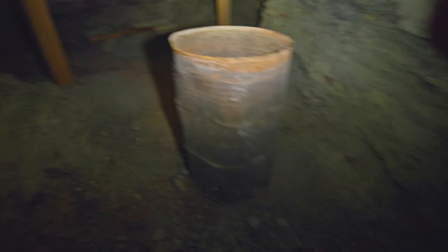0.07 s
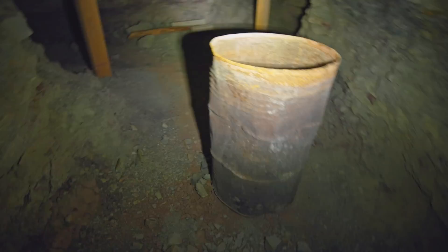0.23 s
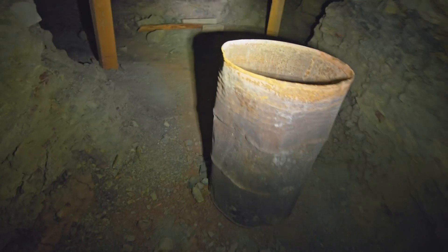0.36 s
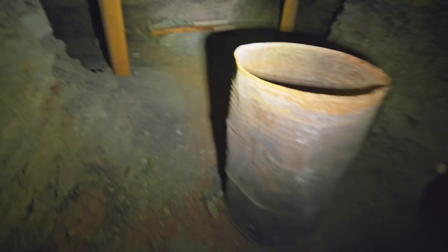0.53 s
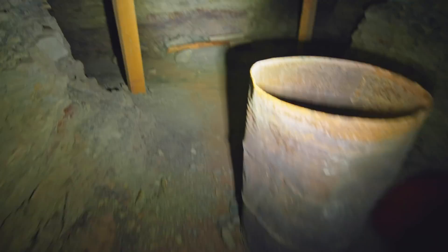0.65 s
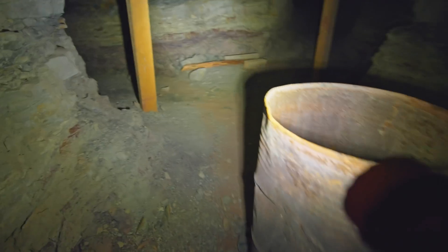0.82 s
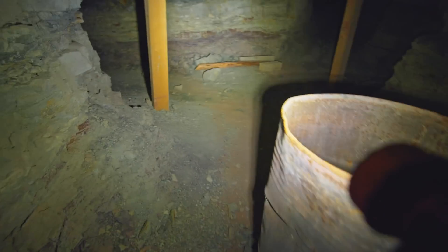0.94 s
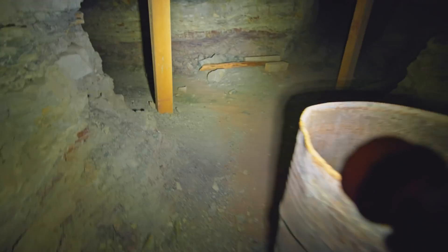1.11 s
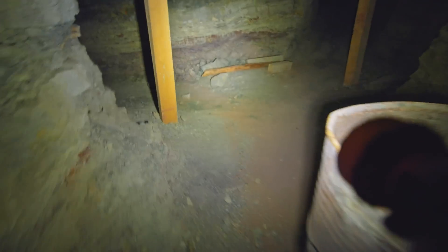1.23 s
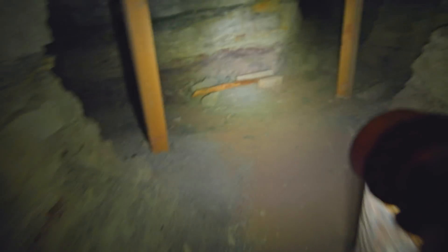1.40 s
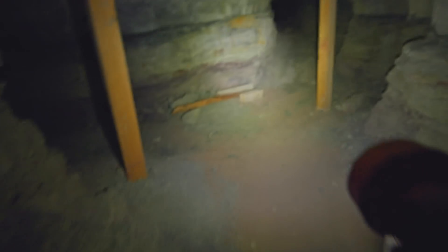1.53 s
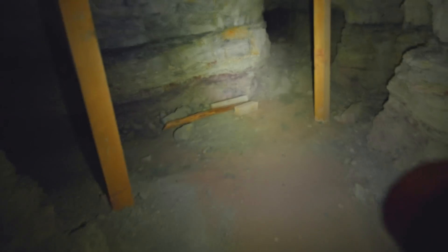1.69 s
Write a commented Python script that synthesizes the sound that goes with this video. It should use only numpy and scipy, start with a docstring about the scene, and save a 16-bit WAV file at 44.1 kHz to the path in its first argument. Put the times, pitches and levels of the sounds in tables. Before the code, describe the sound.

A few loose stones clack, then a boot lands hard with a hollow knock and gritty crunch, a stone clicks, and a second softer crunch follows; close handheld microphone, short echo off rock walls.

```python
"""Two footsteps in a mine tunnel

Boots land on loose rock and gravel in a narrow tunnel, heard from a hand-held camera.
Pressure of the sole drives noise grains (stones, grit, sand); struck sines thump, knock, crack and chink.
Loose stones clack as short coloured noise; the rock walls answer with early echoes and a bass-heavy tail.
Filtered noise gives faint hiss, the rumble of the moving camera and the brush of trousers."""
import sys
import numpy as np
from scipy import signal
from scipy.fft import rfft, irfft, next_fast_len
from scipy.io import wavfile

SR = 44100
rng = np.random.default_rng(int(sys.argv[2]) if len(sys.argv) > 2 else 0)


def log_audio(samples):
    """Write samples as a 16-bit WAV file to the path given in sys.argv[1]."""
    # one column per channel
    frames = np.atleast_2d(samples).T
    # limit to full scale, then quantise
    limited = np.clip(frames, -1, 1)
    pcm = np.round(limited * 32767).astype(np.int16)
    wavfile.write(sys.argv[1], SR, pcm)


N = 77175

# spectrum of grit: (frequency [Hz], relative density [dB per Hz])
GRIT_COLOUR = [(300, -6), (1200, 0), (2500, 2.5), (4100, 3), (5200, -11.5), (7000, -20), (10000, -32),
               (15000, -42)]
# spectrum of sand and cloth: (frequency [Hz], relative density [dB per Hz])
SAND_COLOUR = [(1500, -28), (4000, 4), (6500, 0.5), (10000, -7), (15000, -11.5)]


def amp(db):
    """Decibels to gain."""
    return 10 ** (np.asarray(db) / 20)


def unit(x):
    """Scale to rms 1."""
    return x / np.sqrt(np.mean(x ** 2) + 1e-20)


def along(points, hz):
    """Interpolate (Hz, value) points on a log frequency axis."""
    point_hz, value = np.transpose(points)
    return np.interp(np.log(hz + 1), np.log(point_hz + 1), value)


def curve(rows):
    """Interpolate (s, value) points at every sample."""
    return np.interp(np.arange(N) / SR, *np.transpose(rows))


def since(start_s):
    """Seconds since a moment, zero before it."""
    return np.maximum(np.arange(N) / SR - start_s, 0)


def ring(t, t60_s, rise_s):
    """Envelope with a quick rise and an exponential fall of 60 dB per t60."""
    return np.exp(-np.log(1000) * t / t60_s) * (1 - np.exp(-t / rise_s))


def mode(start_s, db, hz, t60_s, rise_s):
    """One struck resonance: a decaying sine."""
    t = since(start_s)
    return amp(db) * ring(t, t60_s, rise_s) * np.sin(2 * np.pi * hz * t)


def colour(x, points, tilt_db_per_octave=0):
    """Minimum-phase filter of unit energy through (Hz, dB) points; the tilt acts above 500 Hz."""
    m = 2 * next_fast_len(N)
    hz = np.fft.rfftfreq(m, 1 / SR)
    gain_db = along(points, hz) + tilt_db_per_octave * np.log2(np.maximum(hz, 500))
    gain = unit(amp(gain_db))
    # folding the cepstrum makes the filter causal
    cepstrum = irfft(np.log(gain + 1e-6))
    fold = np.r_[1, np.full(m // 2 - 1, 2), np.zeros(m // 2)]
    response = np.exp(rfft(cepstrum * fold))
    return irfft(rfft(x, m) * response)[:N]


def resonate(x, modes):
    """Parallel resonances of unit energy together; heavy stones pass on little above the contact limit."""
    contact_hz = 2650
    m = 2 * next_fast_len(N)
    f = np.fft.rfftfreq(m, 1 / SR)
    response = sum(amp(db) * 1j * f * width_hz / (hz * hz - f * f + 1j * f * width_hz)
                   for hz, width_hz, db in modes)
    response = response / (1 + 1j * f / contact_hz) ** 2
    response = response / np.sqrt(np.mean(np.abs(response) ** 2))
    return irfft(rfft(x, m) * response, m)[:N]


def grains(per_s, spread_db):
    """Random contacts of either sign and scattered size, rms 1."""
    chance, size, side = rng.random(N), rng.standard_normal(N), rng.standard_normal(N)
    contact = chance < per_s / SR
    return unit(contact * np.sign(side) * amp(spread_db * np.clip(size, -2, 2)))


def load(start_s, attack_s, hold_s, release_db_per_s, rise_share=1):
    """Pressure of the sole: it rises, holds and lets go."""
    rise = np.minimum(since(start_s) / (attack_s * rise_share), 1)
    return rise * amp(-release_db_per_s * since(start_s + attack_s + hold_s))


def hiss():
    """Faint steady noise whose level wavers."""
    # (frequency [Hz], relative density [dB per Hz])
    air_colour = [(20, 4.5), (90, -2), (150, -6.5), (280, -9), (460, -9.5), (700, -15), (1250, -19),
                  (1630, -14.5), (2500, -23.5), (3500, -15), (4300, -22), (5200, -29.5), (8000, -39),
                  (15000, -43)]
    # (time [s], level over the base [dB])
    hiss_sway = [(0, 7), (.2, 1), (.45, 3), (.9, -0.5), (1.0, 3), (1.12, 5), (1.4, 3), (1.6, -2),
                 (1.75, 2.5)]
    base_db = -53
    return amp(base_db + curve(hiss_sway)) * unit(colour(rng.standard_normal(N), air_colour))


def camera_rumble():
    """Low noise that swells and sinks as the carried camera moves."""
    # (frequency [Hz], relative density [dB per Hz])
    rumble_colour = [(5, -25.5), (13, 19), (28, 2.5), (50, -6.5), (85, -9.5), (130, -31.5), (400, -57.5)]
    # (time [s], level over the base [dB])
    rumble_sway = [(0, 3.5), (.25, 7), (.43, 11.5), (.53, 9), (.64, 11), (.8, 19), (.92, 4.5), (1.2, -5),
                   (1.45, 5.5), (1.75, 7)]
    base_db = -49
    return amp(base_db + curve(rumble_sway)) * unit(colour(rng.standard_normal(N), rumble_colour))


def swishes():
    """Trousers brush as a leg swings: bright noise under smooth humps."""
    # (centre time [s], width [s], level [dB])
    swings = [(0.391, 0.036, -67.5), (1.17, .075, -71.5), (1.69, 0.12, -72.5)]
    level = sum(amp(db) * np.exp(-((since(0) - centre_s) / width_s) ** 2) for centre_s, width_s, db in swings)
    return level * colour(rng.standard_normal(N), SAND_COLOUR)


def clacks():
    """A loose stone strikes with its own brightness and ring; the rough rock nearby scatters the sound."""
    # (time [s], level [dB], tilt [dB per octave], rise [s], ring [Hz], ring boost [dB], scatter t60 [s])
    strikes = [(0.14, -36.5, 1.2, 0.0033, 870, 5.5, 0.15), (.229, -32, -2.1, 0.00024, 1490, 6, 0.13),
               (0.2522, -39, 0.5, 0.0014, 2700, 17, 0.031), (.307, -45.5, 0, .0003, 700, 7, 0.048),
               (.454, -38.5, 4.5, 0.0034, 1680, 3, 0.063), (.842, -29.5, 0.24, 0.00061, 1955, 6, 0.16),
               (.882, -62, 7, 0.00013, 1490, 16, 0.064), (1.197, -49.5, 4.5, 0.00046, 2030, 15, 0.17)]
    # (frequency [Hz], relative density [dB per Hz])
    clack_colour = [(60, -30.5), (180, -2), (320, -6.5), (480, -2.5), (650, 0.5), (1000, -3.5),
                    (1500, -4.5), (2100, -12), (3000, -10.5), (4200, -15.5), (5300, -23.5), (9000, -33),
                    (15000, -51)]
    strike_t60_s, scatter_db, click_db, ring_width_octaves = 0.0099, -4.5, 1, 0.29
    out = np.zeros(N)
    hz = np.geomspace(30, 16000, 120)
    for start_s, db, tilt, rise_s, ring_hz, ring_db, scatter_t60_s in strikes:
        t = since(start_s)
        direct = 2 * ring(t, strike_t60_s, rise_s)
        scatter = amp(scatter_db) * ring(t, scatter_t60_s, rise_s)
        strike = (direct + scatter) * rng.standard_normal(N)
        # a faster rise clicks harder
        strike[round(start_s * SR)] += amp(click_db) * 0.0016 / rise_s
        ring_bump = np.exp(-(np.log2(hz / ring_hz) / ring_width_octaves) ** 2)
        tone_db = along(clack_colour, hz) + ring_db * ring_bump
        out += amp(db) * colour(strike, np.c_[hz, tone_db], tilt)
    return out


def thumps():
    """The body's weight lands on the floor: low struck modes."""
    # (time [s], level [dB], pitch [Hz], t60 [s])
    landings = [(0.296, -32, 82.5, 0.14), (.578, -25, 92.1, 0.37), (0.623, -26, 51.6, 0.21),
                (.695, -25, 72, 0.14), (1.307, -36, 89, 0.063), (1.387, -29, 80, 0.41),
                (1.447, -31.5, 81.6, 0.26)]
    return sum(mode(start_s, db, hz, t60_s, rise_s=0.0043) for start_s, db, hz, t60_s in landings)


def knocks():
    """Heel and sole knock on big stones: short hollow modes."""
    # (time [s], level [dB], pitch [Hz])
    heel_hits = [(0.5403, -17, 330), (0.5527, -10, 437), (0.5633, -16.5, 426), (0.5701, -16, 473),
                 (0.5736, -35, 405), (0.586, -14, 367), (0.606, -26, 338), (1.299, -37, 320),
                 (1.318, -30.5, 293), (1.546, -34, 370), (1.564, -30.5, 425)]
    return sum(mode(start_s, db, hz, t60_s=0.031, rise_s=0.0016) for start_s, db, hz in heel_hits)


def chinks():
    """Struck stones that go on ringing."""
    # (time [s], level [dB], pitch [Hz], t60 [s])
    ringing_stones = [(.229, -38.5, 589.6, 0.13), (.229, -40.5, 807, 0.083), (0.624, -30.5, 1307, 0.28),
                      (.75, -42.5, 1630, 0.4)]
    return sum(mode(start_s, db, hz, t60_s, rise_s=0.0011) for start_s, db, hz, t60_s in ringing_stones)


def cracks():
    """Larger stones slip under the sole: a few cycles of ring and a gritty snap."""
    # (time [s], level [dB], pitch [Hz])
    slips = [(0.5832, -46, 1100), (.5992, -43, 800), (.6192, -9.5, 710), (.6262, -11, 800),
             (.6345, -8, 1110), (0.656, -9, 1350), (0.675, -10.5, 1090), (1.319, -15, 900),
             (1.365, -17, 1140), (1.42, -19.5, 1170), (1.436, -17.5, 810), (1.4645, -18.5, 770)]
    cycles_per_t60, snap_db = 7.56, -30
    body = sum(mode(start_s, db, hz, cycles_per_t60 / hz, rise_s=0.00063) for start_s, db, hz in slips)
    snap = sum(amp(db + snap_db) * ring(since(start_s), 0.004, 0.0001) for start_s, db, hz in slips)
    return body + colour(snap * rng.standard_normal(N), GRIT_COLOUR)


def stone_beds(pressure):
    """Stones grind together: a broad rattle of rubble plus the ring of the bed under each foot."""
    # rubble: (frequency [Hz], relative density [dB per Hz])
    rubble_colour = [(100, -7), (350, -7), (600, 5.5), (900, 0.5), (1280, 1), (1500, -9.5), (2000, -6),
                     (2700, -15), (4200, -28), (5500, -36), (15000, -68)]
    # resonances of each bed: (frequency [Hz], width [Hz], relative level [dB])
    first_bed = [(340, 15, -18), (433, 19, 15), (591, 8.3, 15), (733, 20, 5), (918, 91, 1.5),
                 (1080, 10, -15), (1294, 52, 2.5), (1360, 38, -2)]
    second_bed = [(314, 68, 4), (630, 30, -12), (810, 150, 3.5), (1110, 30, -8)]
    first_bed_db, second_bed_db = -5.5, -8
    first_rubble_db, second_rubble_db = -2.5, -10.5
    between_steps_s = 1.1
    later = since(between_steps_s) > 0
    first = pressure * ~later * grains(per_s=700, spread_db=4.5)
    # the second foot lands on smaller stones
    second = pressure * later * grains(per_s=2800, spread_db=3)
    rubble = colour(amp(first_rubble_db) * first + amp(second_rubble_db) * second, rubble_colour)
    first_ring = amp(first_bed_db) * resonate(first, first_bed)
    second_ring = amp(second_bed_db) * resonate(second, second_bed)
    return rubble + first_ring + second_ring


def gravel():
    """The sole's pressure drives grinding stones, grit, sand and a dull scuff; grit gives way in bright bursts."""
    # each step lands, then rolls on: (time [s], attack [s], hold [s], stone release [dB per s],
    # stones [dB], grit [dB], sand [dB], low scuff [dB])
    presses = [(0.231, .005, 0.0082, 232, -48.5, -55.5, -71, -48),
               (0.527, 0.047, 0.055, 177, -30.5, -43, -56.5, -34),
               (.650, 0.016, 0.026, 400, -38, -47.5, -63, -62),
               (0.738, 0.014, 0.0083, 251, -47, -47, -81, -38),
               (1.259, 0.056, 0.016, 152, -31, -44, -53.5, -34.5),
               (1.388, 0.023, 0.017, 175, -38.5, -51, -63, -41.5)]
    # pockets of grit burst under the boot: (time [s], grit [dB], sand [dB], t60 [s])
    bursts = [(0.537, -35.5, -44.5, 0.054), (0.5735, -47, -47.5, 0.1), (0.582, -29.5, -72, 0.044)]
    # (frequency [Hz], relative density [dB per Hz])
    scuff_colour = [(30, -0.5), (90, 5.5), (150, -5), (250, -0.5), (340, 0), (450, -7), (600, -5.5),
                    (1200, -27.5), (4000, -56)]
    fine_rise_share, fine_release_share, scuff_rise_share = 0.59, 0.84, 0.42
    sand_per_s, sand_spread_db = 5900, 1
    spray_tilt_db_per_octave = 6
    stones, grit, sand, spray, scuff = np.zeros((5, N))
    for start_s, attack_s, hold_s, release, stones_db, grit_db, sand_db, scuff_db in presses:
        fine = load(start_s, attack_s, hold_s, release * fine_release_share, fine_rise_share)
        stones += amp(stones_db) * load(start_s, attack_s, hold_s, release)
        grit += amp(grit_db) * fine
        sand += amp(sand_db) * fine
        scuff += amp(scuff_db) * load(start_s, attack_s, hold_s, release, scuff_rise_share)
    for start_s, grit_db, sand_db, t60_s in bursts:
        burst = ring(since(start_s), t60_s, rise_s=0.0018)
        grit += amp(grit_db) * burst
        spray += amp(sand_db) * burst
    out = stone_beds(stones)
    out += colour(grit * grains(per_s=2400, spread_db=-1.5), GRIT_COLOUR)
    out += colour(sand * grains(sand_per_s, sand_spread_db), SAND_COLOUR)
    out += colour(scuff * rng.standard_normal(N), scuff_colour)
    out += colour(spray * grains(sand_per_s, sand_spread_db), SAND_COLOUR, spray_tilt_db_per_octave)
    return out


def tunnel(x):
    """Near walls echo at once; the diffuse tail lasts longest in the bass."""
    # (frequency [Hz], t60 [s])
    tail_t60 = [(60, 1.0), (250, 0.97), (500, 0.68), (1200, 0.51), (4000, 0.51), (12000, 0.45)]
    tail_db, walls_db, walls_s = -13.5, -12.5, 0.03
    hz, t, z = signal.stft(rng.standard_normal(SR), SR, nperseg=256)
    decay = amp(-60 * t / along(tail_t60, hz)[:, None])
    tail = signal.istft(z * decay, SR, nperseg=256)[1]
    tail = tail * np.minimum(np.arange(len(tail)) / SR / walls_s, 1)
    delay_s = 0.002 + rng.random(size=24) * walls_s
    size = rng.standard_normal(size=24)
    walls = np.bincount((delay_s * SR).astype(int), size, len(tail))
    answer = amp(tail_db) * tail / np.linalg.norm(tail) + amp(walls_db) * walls / np.linalg.norm(walls)
    return signal.fftconvolve(x, answer)[:N]


def scene():
    """The steps with the tunnel's answer; thumps, hiss and rumble stay dry."""
    feet = swishes() + clacks() + knocks() + chinks() + cracks() + gravel()
    return (hiss() + camera_rumble() + thumps() + feet + tunnel(feet))[None]


def record(dry):
    """The camera keeps nothing above its band limit."""
    top_hz = 15730
    m = next_fast_len(N + SR // 2)
    kept = np.fft.rfftfreq(m, 1 / SR) < top_hz
    return irfft(rfft(dry, m) * kept, m)[..., :N]


dry = scene()
out = record(dry)
log_audio(out)
```